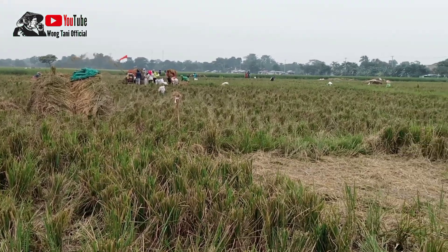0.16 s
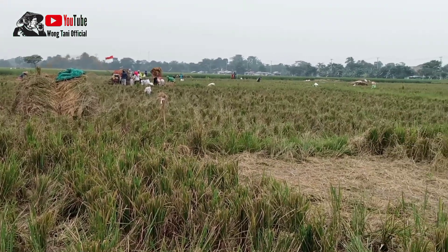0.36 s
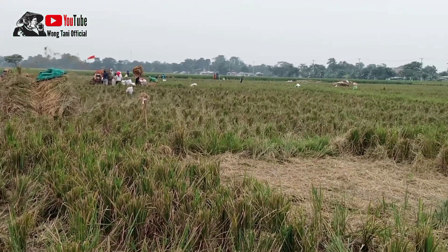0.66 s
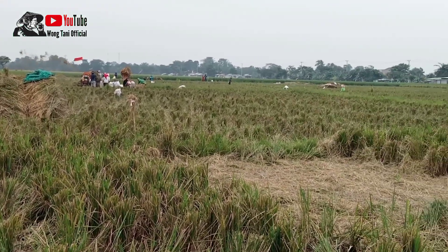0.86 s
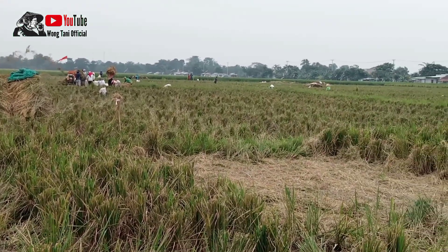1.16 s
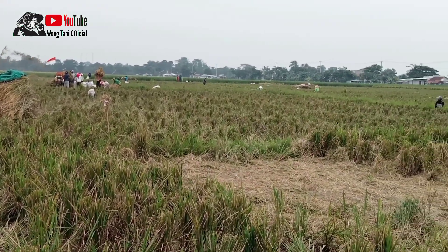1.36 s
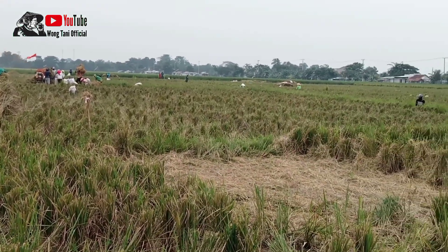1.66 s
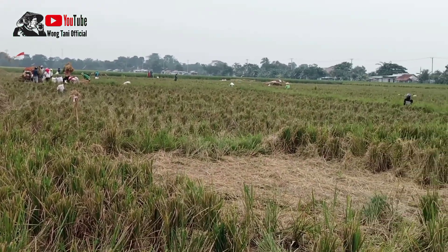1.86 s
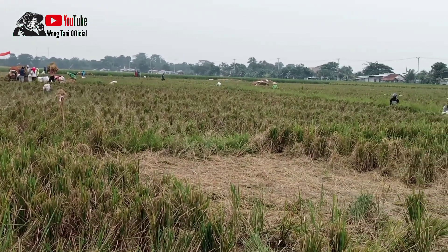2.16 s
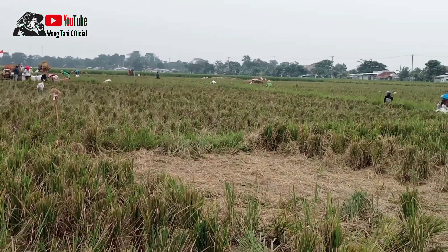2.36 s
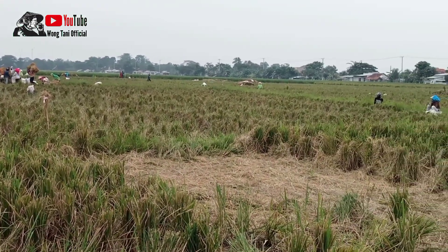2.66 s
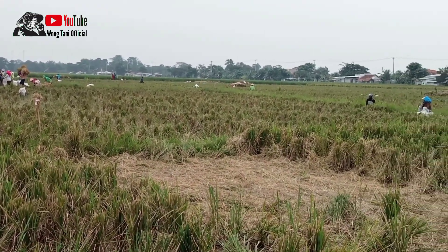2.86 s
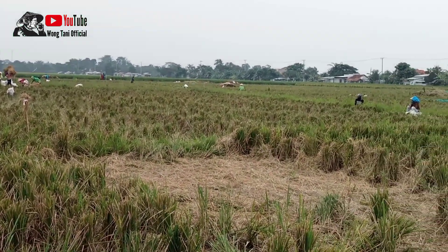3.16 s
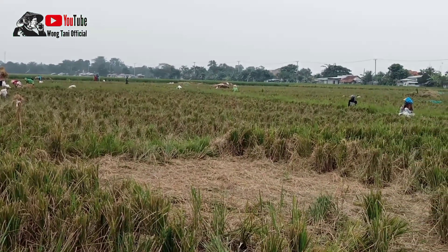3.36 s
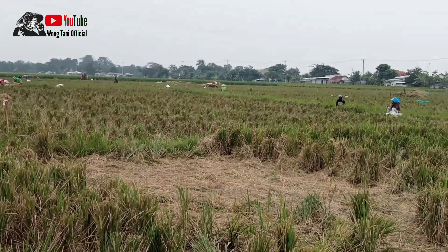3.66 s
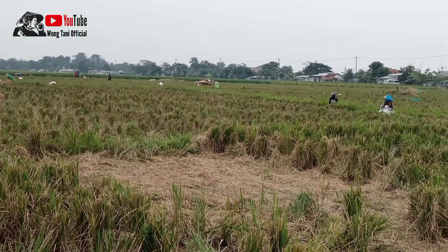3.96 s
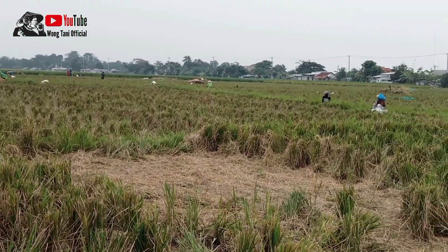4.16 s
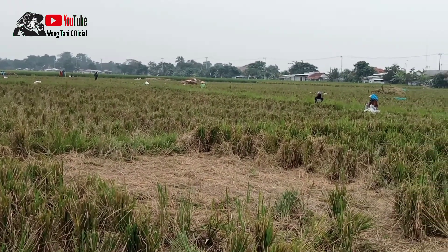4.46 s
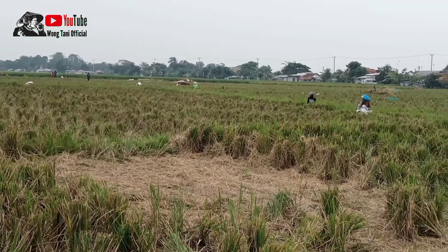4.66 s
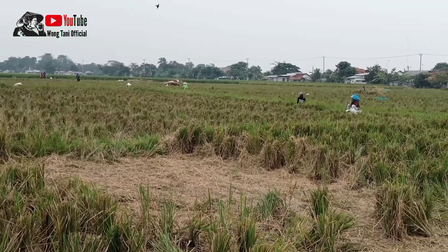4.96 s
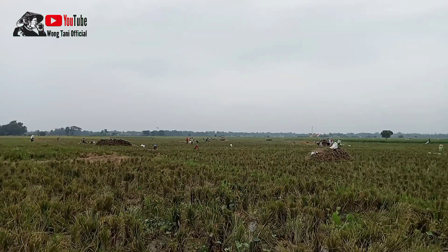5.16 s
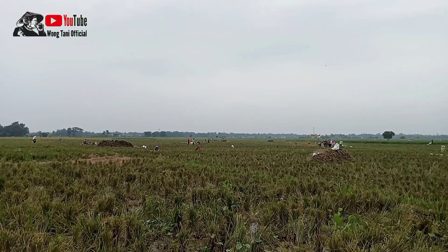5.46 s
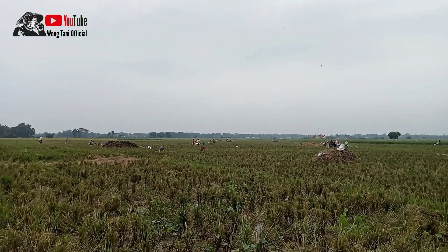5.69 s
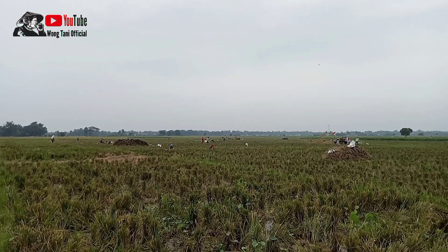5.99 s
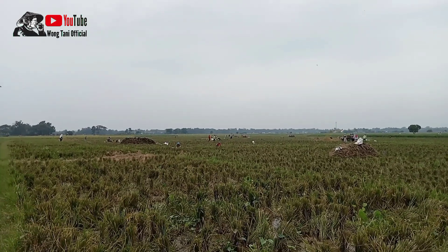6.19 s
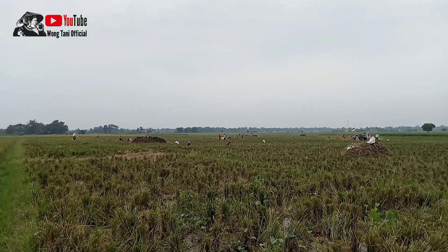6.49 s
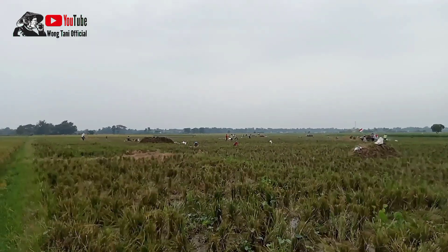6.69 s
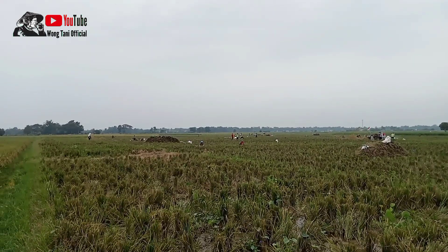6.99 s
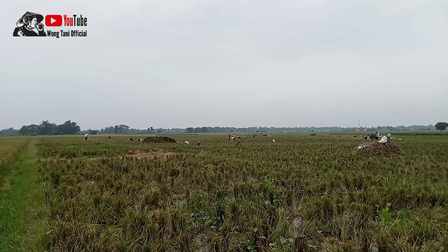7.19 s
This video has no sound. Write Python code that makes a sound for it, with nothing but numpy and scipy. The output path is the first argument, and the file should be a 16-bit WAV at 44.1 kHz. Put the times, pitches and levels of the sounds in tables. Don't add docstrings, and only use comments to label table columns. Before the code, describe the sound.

In an open field a small single-cylinder engine runs a rice thresher, firing about thirty times a second as a continuous rough flutter. Each firing gives a raspy, metallic-ringing spit of gas and a low thump, over drum rumble and thin chaff hiss. At 1.2 s a straw gives one sharp dry tap. From 0 to 2.5 s the exhaust colour shifts as the microphone turns; around 2.8 s it swings into the exhaust, becoming clearly louder, brighter and fizzier until 5 s. The engine sags near 3.1 s, then recovers. At 5.0 s comes a very short silence, then a quick fade into a farther, much quieter view: a dull smeared putter and hum, another engine beating against it, high insect hiss. Gusts lift a whistle near 5.2 and 5.9 s, with fainter ones at 6.1 and 6.9 s. Dry stalks rustle at 6.6 and 6.9 s; the hum continues to 7.3 s.

```python
import sys
import numpy as np
from scipy import signal
from scipy.fft import rfft, irfft, next_fast_len
from scipy.io import wavfile
from scipy.ndimage import uniform_filter1d, map_coordinates

SR = 44100
rng = np.random.default_rng(int(sys.argv[2]) if len(sys.argv) > 2 else 0)


def boost_factor(decibels):
    exponent = np.asarray(decibels, float) / 20
    return 10 ** exponent


def dump(signal):
    limited = np.clip(np.atleast_2d(signal).T, -1, 1)
    pcm = np.round(limited * 32767).astype(np.int16)
    wavfile.write(sys.argv[1], SR, pcm)


N = 323253
TIME = np.arange(N) / SR
CUT, RESUME = 5.008, 5.063
IS_FAR = TIME > CUT

# t/s, bearing (0 aside, 1 turning, 2 oblique, 3 and up head-on)
BEARING = [(0, 0.79), (.5, 0.66), (1.0, 0.31), (1.4, 1), (1.9, 1), (2.4, 1), (2.65, 1.68), (2.88, 3.03),
           (3.0, 2.66), (3.2, 3.1), (5, 11.8)]
# t/s, burst level/dB, clarity of the air path/dB
REACH = [(0, -42, -13.5), (.3, -41.5, -19.5), (.8, -42.5, -10.5), (1.15, -40, -11), (1.7, -37, -12.5),
         (1.92, -40.5, -11.5), (2.25, -43.5, -18), (2.4, -39, -14), (2.84, -37, -3.5), (2.95, -33, -12.5),
         (3.3, -30, -2.5), (4.2, -29, -8), (4.5, -31, -14), (4.75, -29.5, -8), (5, -35, -17),
         (5.06, -51, -11.5), (6.15, -56.5, -14.5), (7.33, -58.5, -15.5)]
# t/s, length/s, level/dB
GUSTS = [
    (5.157, .21, 1),
    (5.858, 0.17, 2.5),
    (6.072, 0.09, -10),
    (6.9, 0.11, -12),
]
HUM = (-40.5, -41.5, 0.17)


def unit(x):
    return x / np.sqrt(np.mean(x ** 2) + 1e-20)


def curves(rows):
    s, *cols = np.transpose(rows)
    return [np.interp(TIME, s, c) for c in cols]


def filtered(x, response):
    m = next_fast_len(N + SR // 4)
    return irfft(rfft(x, m) * response(np.fft.rfftfreq(m, 1 / SR)), m)[..., :N]


def resonance(f, centre, width, db):
    return boost_factor(db) * 1j * f * width / (centre * centre - f * f + 1j * f * width)


def modes(table):
    return lambda f: sum((-1) ** k * resonance(f, *row) for k, row in enumerate(table))


def pipe(table, leak_db):
    return lambda f: boost_factor(leak_db) + sum(resonance(f, *row) for row in table)


def highpass(hz, corner, order):
    return 1 / (1 + (corner / (hz + 1)) ** order)


def patchy(depth_db, bins, frames):
    z = signal.stft(rng.standard_normal(N + 512), nperseg=256)[2]
    field = uniform_filter1d(rng.standard_normal(z.shape), bins, 0)
    field = uniform_filter1d(field, frames, 1)
    return unit(signal.istft(z * boost_factor(depth_db * unit(field)), nperseg=256)[1][:N])


def coloured(x, spectrum):
    f, db = np.transpose(spectrum)
    return unit(filtered(x, lambda hz: boost_factor(np.interp(np.log(hz + 1), np.log(f), db))))


def wobble(rate, count):
    knots = rng.standard_normal((count, int(N * rate / SR) + 4))
    coarse = np.arange(0, N + 64, 64)
    return [np.interp(np.arange(N), coarse, map_coordinates(k, [coarse * rate / SR])) for k in knots]


def level(near_db, far_db, grows):
    usual_burst_db = np.where(IS_FAR, -56, -40)
    return np.where(IS_FAR, far_db, near_db) + grows * (curves(REACH)[0] - usual_burst_db)


def shares():
    bearing = curves(BEARING)[0].clip(0, 3)
    return [np.clip(1 - abs(bearing - k), 0, 1) for k in range(4)]


def breeze():
    # f/Hz, level/dB per Hz
    wind_colour = [(12, -25), (25, 4), (40, -4), (60, -29)]
    strength_db = level(*HUM) - 30 + 3.3 * wobble(7.8, count=1)[0]
    return boost_factor(strength_db) * coloured(rng.standard_normal(N), wind_colour)


def hiss():
    # f/Hz, level/dB per Hz
    chaff_colour = [(240, -42), (400, -16.5), (1450, -15.5), (1740, -7), (2400, -14), (3790, -9),
                    (4840, -24), (6000, -19), (15500, -28.5)]
    # f/Hz, level/dB per Hz
    field_colour = [(240, -62), (400, -11), (560, -13), (990, -4), (1500, -4), (2100, -5.5), (3500, -14),
                    (5200, -22.5), (7200, -15.5), (9400, -24), (10300, -30), (13000, -36), (15500, -35)]
    air = patchy(depth_db=3.5, bins=4, frames=12)
    chorus = modes([(7110, 340, 0)])
    insects = unit(filtered(patchy(depth_db=5, bins=3, frames=4), lambda f: chorus(f) ** 2))
    afar = coloured(air, field_colour) + boost_factor(-8.5) * insects
    return boost_factor(level(near_db=-52, far_db=-60, grows=0.42)) * np.where(IS_FAR, afar, coloured(air, chaff_colour))


def rustles():
    # t/s, level/dB, fall by 60 dB/s
    brushes = [
        (6.59, -45, 0.18),
        (6.62, -56, .05),
        (6.87, -52, 0.12),
        (6.921, -49, 0.15),
        (6.96, -58, 0.091),
    ]
    # f/Hz, level/dB per Hz
    stalk_colour = [(700, -40), (1100, -6), (1600, 6), (2500, -1), (4000, -16), (9000, -9), (12000, -45)]
    envelope, t = np.zeros(N + SR), np.arange(SR // 5) / SR
    for s, db, t60 in brushes:
        envelope[round(s * SR):][:len(t)] += boost_factor(db - 60 * t / t60) * (1 - np.exp(-t / 0.0042))
    return envelope[:N] * coloured(patchy(depth_db=-2, bins=6, frames=2), stalk_colour)


def knocks():
    # t/s, level/dB, f/Hz, fall by 60 dB/s
    taps = [
        (1.221, -27, 2590, 0.019),
        (1.235, -14.5, 2620, 0.0062),
    ]
    out, t = np.zeros(N + SR), np.arange(SR // 10) / SR
    for s, db, hz, t60 in taps:
        grit = 1 + 0.47 * uniform_filter1d(rng.standard_normal(len(t)), size=8)
        envelope = boost_factor(db - 60 * t / t60) * (1 - np.exp(-t / 0.0013))
        out[round(s * SR):][:len(t)] += envelope * grit * np.sin(2 * np.pi * hz * t)
    return out[:N]


def crank():
    # t/s, firings per second
    speed = [(0, 30.664), (.93, 30.855), (1.09, 30.529), (1.45, 31.169), (2.25, 31.296), (2.69, 30.346),
             (2.89, 30.584), (3.13, 27.971), (3.61, 28.87), (4.17, 28.843), (4.65, 30.021), (4.77, 31.114),
             (5, 30.371), (5.17, 28.798), (5.42, 30.228), (6.18, 30.782), (7.33, 30.78)]
    run = np.cumsum(curves(speed)[0]) / SR
    near = run - run[0] - 0.203
    far = run - run[round(5.17 * SR)] + 155.871
    return np.maximum.accumulate(np.where(IS_FAR, far, near))


def hum():
    # multiple of the firing rate, level/dB
    low_aside = [(1, -35), (2, -9), (3, -5.5), (4, 1.5), (5, -2), (6, -1.5), (7, -5.5), (8, -8.5),
                 (9, -12.5), (10, -8.5), (11, -12.5), (12, -35), (13, -20), (14, -24.5), (15, -38)]
    low_head_on = [(1, -40), (2, -7.5), (3, -2.5), (4, -1.5), (5, 2), (6, -6.5), (7, -9), (8, -8.5),
                   (9, -6.5), (10, -4), (11, -15.5), (12, -12), (13, -22), (14, -43), (15, -35.5)]
    low_afar = [(1, -32), (2, -3), (3, -24.5), (4, 0), (5, 1.5), (6, -1), (7, -12.5), (8, -10.5),
                (9, -10.5), (10, -7), (11, -14), (12, -14.5), (13, -30), (14, -31), (15, -24)]
    # t/s, firings per second, level under the hum/dB
    other_engine = [(0, 30.9, -16), (3.6, 35, -12.5), (4.1, 31.5, -2), (5, 28.3, -19), (5.07, 30, -15),
                    (6.0, 29.4, -2.5), (6.3, 25, -31), (6.55, 27.8, -5.5), (6.9, 28.2, -2),
                    (7.33, 29.4, -3)]
    # multiple of its firing rate, level/dB
    other_tones = [(3, -17), (4, -3), (5, 4), (6, 2.5), (7, -7), (10, -12), (11, -16)]
    # f/Hz, level/dB per Hz
    drum_colour = [(15, -83), (25, -36), (48, -20.5), (91, -8), (113, -2.5), (151, 1), (239, -12),
                   (312, -10.5), (395, -26), (700, -38.5), (910, -80), (1540, -120)]

    turn = crank() - 0.17
    head_on = sum(shares()[2:])
    thump = np.zeros(N)
    drifts = wobble(5, count=len(low_afar))
    for (k, aside_db), (_, head_db), (_, far_db), drift in zip(low_aside, low_head_on, low_afar, drifts):
        near_db = aside_db + head_on * (head_db - aside_db) + 1.52 * drift
        db = np.where(IS_FAR, far_db - 4.0 + 3 * drift, near_db)
        thump += boost_factor(db) * np.cos(2 * np.pi * (k * turn + IS_FAR * 0.0387 * k * k))

    rate, other_db = curves(other_engine)
    other_turn = np.cumsum(rate) / SR
    other = sum(boost_factor(db) * np.cos(2 * np.pi * k * other_turn) for k, db in other_tones)
    drum = coloured(patchy(depth_db=3.0, bins=1, frames=14), drum_colour)
    drum_db = np.where(IS_FAR, -5, -9)
    mix = boost_factor(-5.0) * unit(thump) + boost_factor(other_db) * unit(other) + boost_factor(drum_db) * drum
    return boost_factor(level(*HUM)) * mix


def gusts():
    edge_s = 0.034
    return [np.clip(np.minimum(TIME - s, s + length - TIME) / edge_s + 1, 0, 1) for s, length, _ in GUSTS]


def whistle(gas):
    ring = modes([(3724, 330, -1), (5050, 320, -13)])
    return unit(filtered(gas, lambda f: ring(f) ** 2 * np.exp(-2j * np.pi * f * 0.0027)))


def hand(x):
    # t/s, delay/ms, strength 0-1
    close_echo = [(0, 0.42, 0.06), (1.3, 0.43, 0.45), (2.5, 0.4, 0.11), (3.0, .39, 0.13), (5, 0.41, 0)]
    delay_ms, strength = curves(close_echo)
    return x - strength * map_coordinates(x, [np.arange(N) - delay_ms * SR / 1000])


def firings():
    turn = crank()
    whole = np.arange(0, turn[-1])
    jitter, luck = rng.standard_normal((2, len(whole)))
    at = np.searchsorted(turn, whole) + 0.0003 * SR * jitter
    return np.round(at).astype(int).clip(0, N - 1), luck


def exhaust():
    # f/Hz, width/Hz, level/dB
    pipe_aside = [(2060, 250, -6.0), (2604, 66, -1.0), (3080, 280, -4.5), (3504, 57, 1.5),
                  (4780, 172, -2.5), (5810, 220, -3.0), (6560, 180, -20), (6770, 140, -14),
                  (7500, 120, -31), (8870, 120, -7.5), (9700, 120, -18), (10240, 110, -30),
                  (10900, 190, -26), (4420, 150, -7.0)]
    pipe_turning = [(1930, 210, -13), (2620, 39, -20), (2794, 84, -8), (3650, 92, -11), (3850, 190, -1),
                    (4420, 105, -8.5), (5370, 180, -19.5), (5940, 120, -12), (6800, 310, -12.5),
                    (8790, 350, -10), (9600, 72, -12), (9600, 88, -31), (13900, 160, -16.5),
                    (13400, 190, -34)]
    pipe_oblique = [(1840, 120, -10.5), (3070, 120, -6), (3853, 150, -2.5), (4520, 98, -33),
                    (5040, 89, -11.5), (6040, 190, -10), (7020, 230, -12), (7860, 72, -27),
                    (9200, 290, -13), (10120, 420, -12.5), (10430, 190, -21.5), (11400, 82, -17),
                    (12200, 230, -45), (14400, 120, -30)]
    pipe_head_on = [(2040, 295, -2.5), (3207, 164, 5), (3830, 200, 7), (4566, 76, -4), (5344, 113, -1.5),
                    (6094, 160, -1), (6800, 286, 2.5), (7700, 75, -29), (8330, 270, -5), (9000, 250, -8.5),
                    (9400, 260, -18.5), (9950, 260, -6.5), (11640, 120, -26), (11800, 330, -12.5),
                    (13800, 150, -12), (15200, 160, -9.5)]
    pipe_afar = [(1594, 55, 0.5), (2157, 330, 2.5), (3435, 210, -20), (4600, 98, -10.0), (5000, 170, -18),
                 (5940, 690, -17.5), (7080, 990, -10.0), (8400, 130, -9), (9000, 110, -31),
                 (11900, 240, -21), (14400, 1000, -30), (2960, 410, -11.5)]
    # f/Hz, width/Hz, level/dB
    cover_rings = [(866, 470, -12.5), (1145, 445, -3)]
    # bearing, level/dB
    fizz_beam = [(0, -9), (1, 0), (2, -8), (3.3, -8.5), (4.6, -1), (11, 0)]

    reach_db, clarity_db = curves(REACH)
    blows, parts = gusts(), shares()
    at, luck = firings()
    facing = (parts[3] * ~IS_FAR)[at]
    t = np.arange(SR // 10) / SR

    def swell(rise_s):
        return (1 - np.exp(-t / rise_s)) ** 3

    def puff(rise_s, t60, tail_db, tail_t60):
        return swell(rise_s) * (boost_factor(-60 * t / t60) + boost_factor(tail_db - 60 * t / tail_t60))

    def strokes(shape, lag_s=0):
        moments = (at + lag_s * SR).astype(int).clip(0, N - 1)
        return unit(signal.fftconvolve(np.bincount(moments, boost_factor(0.88 * luck), N), shape)[:N])

    jet = strokes(puff(0.0029, t60=0.018, tail_db=-31.0, tail_t60=0.053), 0.001 * facing)
    spit = strokes(puff(0.0053, t60=0.0095, tail_db=-55.5, tail_t60=0.086), 0.002 * facing)
    knock = strokes(puff(0.0017, t60=0.028, tail_db=-25, tail_t60=0.05), -0.0008)
    smear = strokes(swell(0.0012) * (boost_factor(-60 * (t / 0.025) ** 2) + boost_factor(-11 - 60 * t / 0.051)))

    turbulence = patchy(depth_db=3.0, bins=3, frames=10)
    shimmer = patchy(depth_db=3.5, bins=2, frames=24)
    drifting = patchy(depth_db=3, bins=2, frames=90)
    close = np.array([turbulence * jet, drifting * spit])
    distant = smear * np.array([shimmer, turbulence])

    def heard(x, rings):
        return unit(filtered(x, pipe(rings, leak_db=-28)))

    views = (pipe_aside, pipe_turning, pipe_oblique, pipe_head_on)
    near = sum(np.sqrt(part) * heard(close, rings) for part, rings in zip(parts, views))
    afar = heard(distant, pipe_afar)

    calm_db = -13
    whistle_db = calm_db + sum((db - calm_db) * blow for (_, _, db), blow in zip(GUSTS, blows))
    far_gas = (afar[0] + boost_factor(whistle_db) * whistle(distant[0])) / np.sqrt(1 + boost_factor(2 * whistle_db))
    gas = np.where(IS_FAR, far_gas, hand(near[0]))

    def treble(x):
        return filtered(x, lambda hz: highpass(hz, 8000, 12))

    fizz = unit(treble(hand(near[1])))
    sizzle = filtered(fizz, lambda hz: highpass(hz, 12260, 20))
    sizzle_db = np.interp(curves(BEARING)[0], *np.transpose(fizz_beam))
    near_top = fizz + (boost_factor(sizzle_db) - 1) * sizzle
    hazy = filtered(afar[1], lambda hz: boost_factor(-14.5) * (hz / 14000) ** 3 + 1 / (1 + (hz / 9800) ** 16))
    top = np.where(IS_FAR, unit(treble(hazy)), near_top)

    cover = unit(filtered(np.where(IS_FAR, distant[0], turbulence * knock), modes(cover_rings)))
    cover_db = level(near_db=-12.5, far_db=-13.5, grows=-0.34) - np.where(IS_FAR, 4, 1)
    burst_db = reach_db + 5 * sum(blows)
    return boost_factor(burst_db) * (gas - treble(gas) + boost_factor(clarity_db + 2.0) * top + boost_factor(cover_db) * cover)


def ground(x):
    def notch(f, hz, width_hz):
        return 1 - modes([(hz, width_hz, -1.2)])(f)

    near = filtered(x, lambda f: notch(f, hz=1465, width_hz=417) * notch(f, hz=628, width_hz=158))
    far = filtered(x, lambda f: notch(f, hz=1330, width_hz=460))
    return np.where(IS_FAR, far, near)


def scene():
    return (ground(exhaust() + hiss()) + hum() + knocks() + rustles())[None]


def roll_off(x):
    return signal.sosfilt(signal.butter(12, 16610, fs=SR, output="sos"), x)


def record(dry):
    fade_in = np.clip((TIME - RESUME) / 0.25 + 0.11, 0, 1) ** 1.56
    edit = uniform_filter1d((TIME < CUT) + (TIME > RESUME) * fade_in, size=60)

    def band(hz):
        top = 1 / (1 + (hz / 15350) ** 120) + boost_factor(-52) * (hz < 16600)
        return top * highpass(hz, 55, 6)

    return roll_off((edit * (filtered(dry[0], band) + breeze()))[None])


dry = scene()
out = record(dry)
dump(out)
```